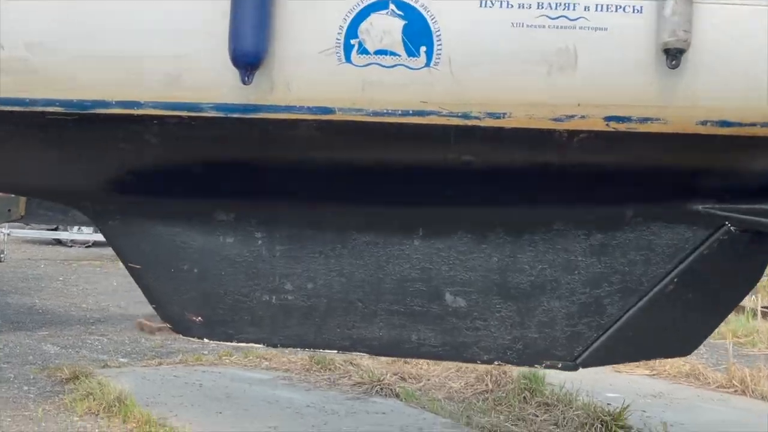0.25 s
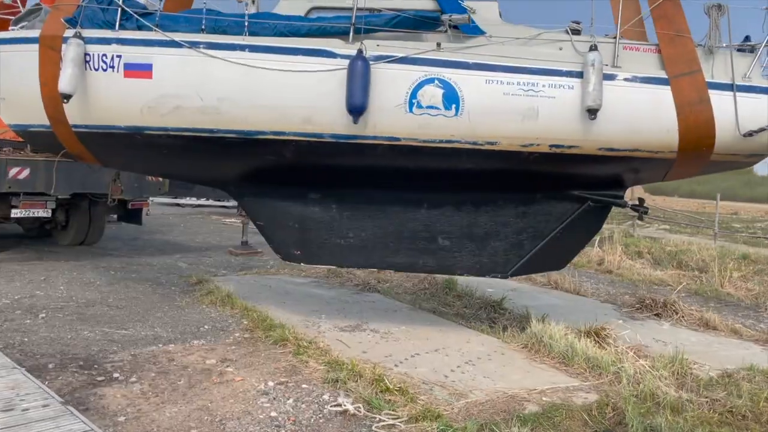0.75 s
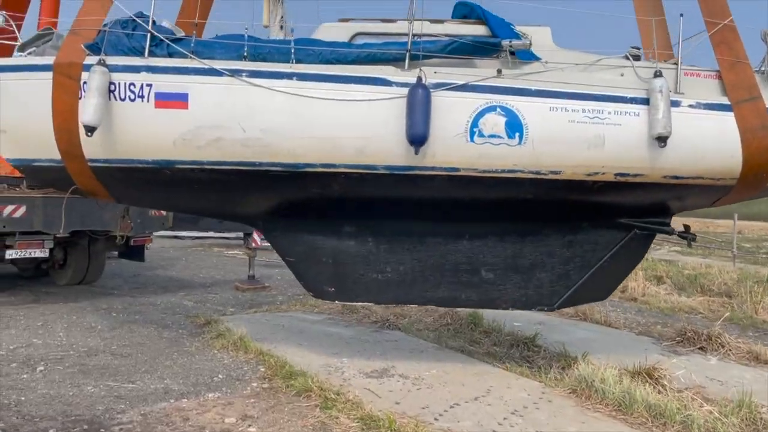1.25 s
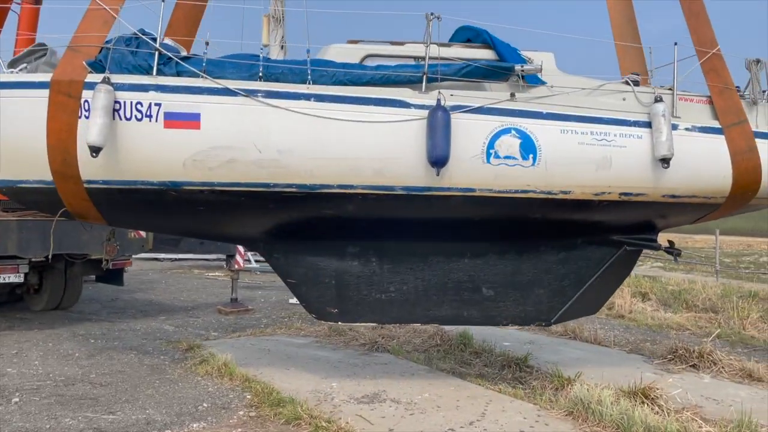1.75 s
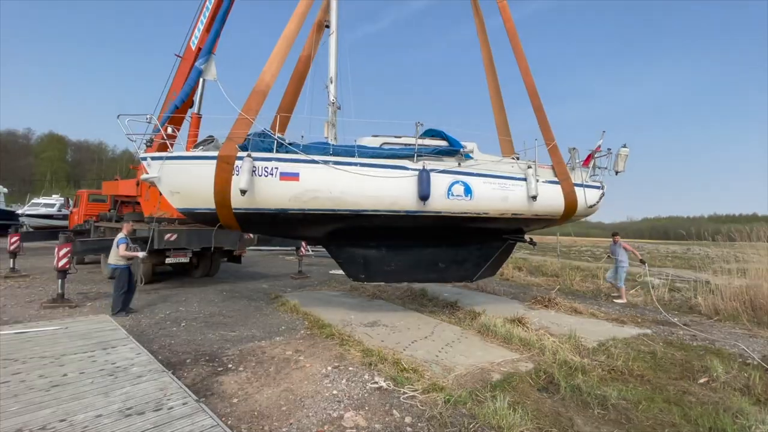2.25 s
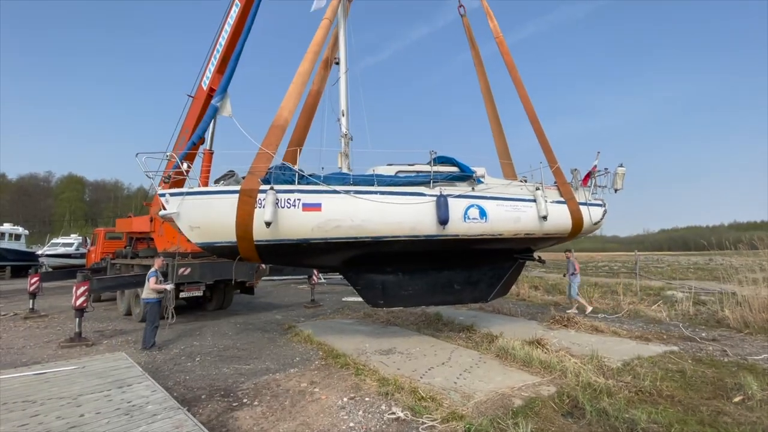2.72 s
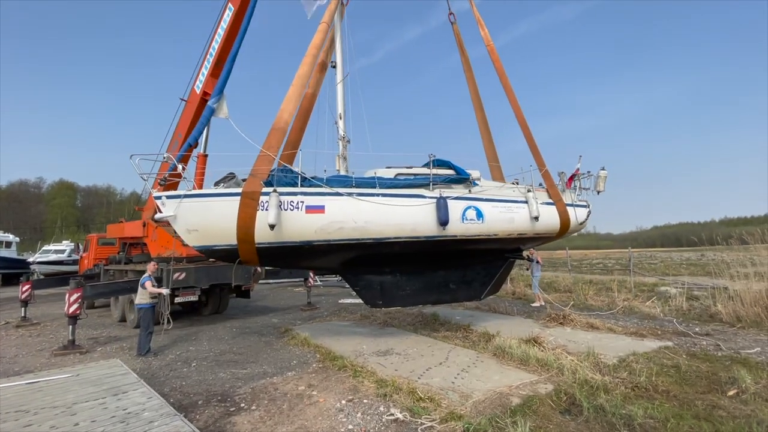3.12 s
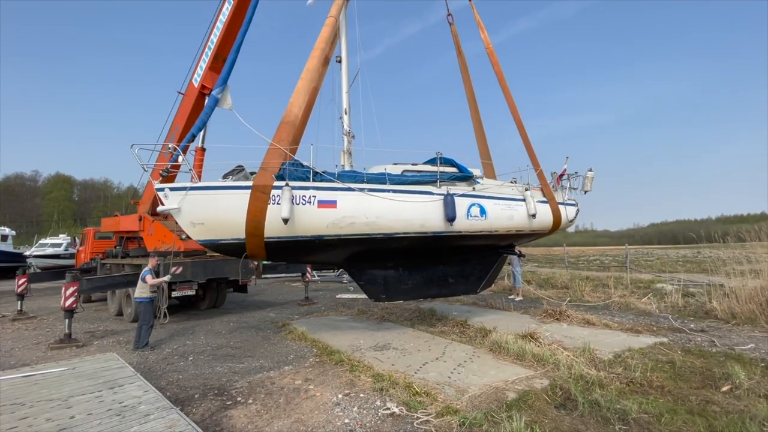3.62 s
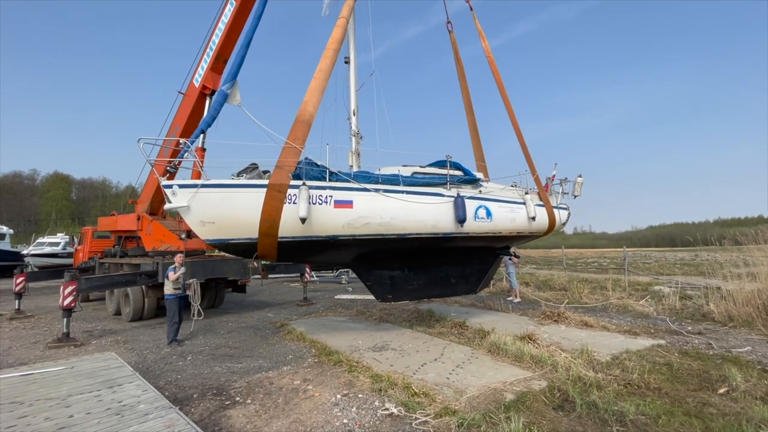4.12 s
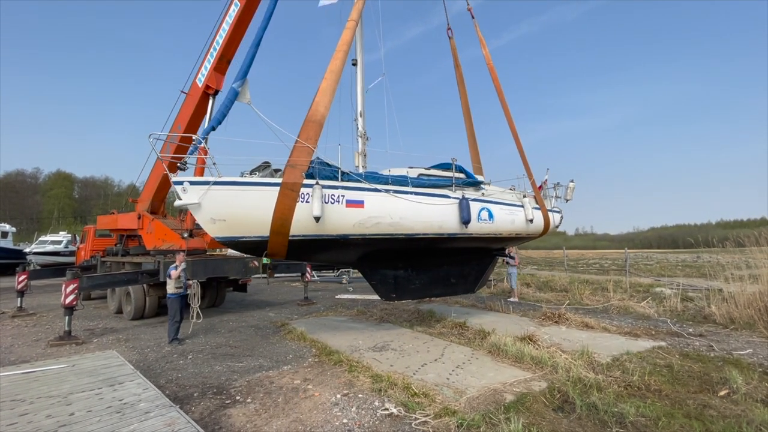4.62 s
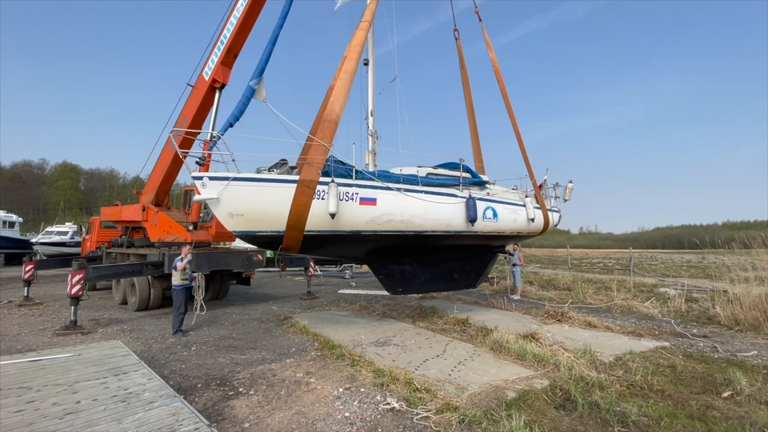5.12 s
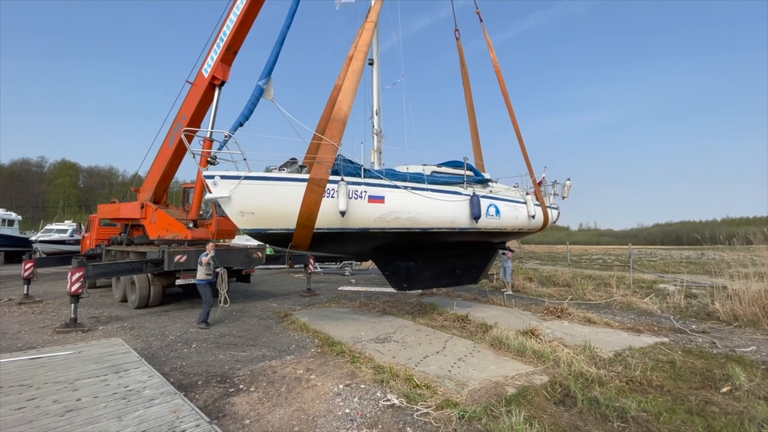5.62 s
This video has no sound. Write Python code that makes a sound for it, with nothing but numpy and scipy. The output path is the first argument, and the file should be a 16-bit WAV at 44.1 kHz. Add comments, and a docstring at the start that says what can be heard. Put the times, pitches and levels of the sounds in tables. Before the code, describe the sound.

A truck crane idles fast in an open yard, about ten metres to the left, and runs without a break for the whole six seconds or so. Its hydraulic pump makes a steady whine of stacked tones that wavers slightly. Beneath it the diesel engine drones and clatters, with ringing metal panels, a fine rattle and a faint ticking hiss. Light wind bumps the microphone at the start, and one brief scrape sounds at about 0.3 seconds. The sound widens just after half a second. The strongest gusts thump and snap on the microphone from about 1.4 to 1.8 seconds. The bass of both engine and wind then thins until roughly 3.2 seconds, while smaller gusts continue. More buffeting comes around 3.3 and 4.1 seconds, then the wind eases and the whine and clatter carry on to the end.

```python
"""You hear a steady whine over a droning, clattering diesel: a truck crane idling fast in an open yard,
some ten metres to the left. The pistons of its hydraulic pump make the whine, a stack of tones. The engine
hums through its exhaust and knocks against ringing panels, while air hisses in ticks. Wind buffets the two
microphone openings (ports): at first it presses both alike, later it pushes one as it pulls the other.
The bass of the whole sound, engine and wind alike, ducks for over a second, probably from the phone's
wind filter."""
import sys
import numpy as np
from scipy import signal
from scipy.fft import rfft, irfft, next_fast_len
from scipy.io import wavfile
from scipy.ndimage import uniform_filter1d, map_coordinates

SR = 44100
rng = np.random.default_rng(int(sys.argv[2]) if len(sys.argv) > 2 else 0)


def pcm_store(signal):
    """Save signal as 16-bit PCM."""
    levels = np.round(np.clip(np.atleast_2d(signal), -1, 1) * 32767)
    wavfile.write(sys.argv[1], SR, levels.astype(np.int16).T)


N = 258867
T, SIZE = np.arange(N) / SR, next_fast_len(N)
HZ = np.arange(SIZE // 2 + 1) * SR / SIZE

# The tone colours of six noises. Each row: frequency in Hz, relative strength there in dB.
YARD_SPECTRUM = [(25, -104), (50, -104), (90, -94), (150, -91), (250, -104), (500, -125)]
WIND_SPECTRUM = [(40, -50), (90, -27), (130, -11), (220, -1), (350, -5.5), (520, -3.5), (800, -7),
                 (1200, -15), (2000, -26), (3000, -63), (5000, -80)]
HISS_SPECTRUM = [(2500, -120), (4000, -95), (6300, -79), (7000, -87.5), (9000, -80), (10000, -82),
                 (12000, -85.5), (16000, -85)]
DRONE_SPECTRUM = [(40, -108), (90, -87), (130, -80), (170, -68), (230, -67), (300, -62), (450, -62.5),
                  (560, -67.5), (800, -64), (1100, -75.5), (1600, -77.5), (2500, -120)]
KNOCK_SPECTRUM = [(500, -120), (900, -69.5), (1150, -70.5), (1400, -71.5), (1650, -68.5), (1800, -76),
                  (2000, -67.5), (2230, -74.5), (2450, -68), (2750, -72), (3000, -71), (3200, -68),
                  (3300, -70), (3600, -66), (3900, -74), (4400, -78.5), (5200, -102), (7000, -120)]
TAPPET_SPECTRUM = [(2500, -110), (3800, -78.5), (4400, -76), (5000, -72.5), (5700, -79.5), (6300, -89),
                   (7500, -78.5), (10000, -120)]
# Steady wind. Each row: time in seconds, level alike on both ports in dB, opposed level in dB.
BREEZE = [(0, -34.5, -49), (.65, -36, -51), (.8, -32, -42), (1.15, -34.5, -44), (1.32, -38.5, -59),
          (1.42, -28.5, -35), (1.77, -33.5, -40), (1.88, -41, -54), (2.16, -38.5, -46), (2.2, -47, -38),
          (2.75, -42, -44), (3.2, -49, -43), (3.45, -70, -39), (3.75, -72, -40), (3.95, -65, -53),
          (4.4, -70, -54), (4.9, -70, -54), (5.87, -70, -46.5)]
# Gusts. Each row: time of the peak in seconds, alike level in dB, opposed level in dB, fade in seconds.
GUSTS = [(.15, -31, -45, 0.018), (.26, -30.5, -60, 0.017), (1.403, -23, -29, 0.03), (1.46, -32, -38, 0.03),
         (1.597, -23, -26, 0.026), (1.64, -25.5, -37, 0.02), (1.685, -25, -29, 0.012),
         (1.74, -25.5, -32, 0.033), (1.945, -35.5, -50, 0.16), (2.095, -32, -36, 0.014),
         (2.15, -31, -39, 0.009), (2.33, -43, -32, .04), (2.5, -44, -35, .04), (2.68, -49, -28, 0.022),
         (2.88, -39.5, -39, 0.08), (2.97, -48, -33, 0.017), (3.08, -56, -37, 0.043), (3.29, -45, -25, 0.03),
         (3.42, -60, -31, .06), (3.58, -60, -34, 0.032), (4.07, -60, -27, 0.028), (4.15, -64, -31, 0.044),
         (4.26, -58, -37, 0.073), (4.6, -58, -36, 0.08), (4.72, -60, -39, 0.14)]
# Wind thumps. Each row: start in seconds, level in dB, pitch in Hz, snap level against the thump in dB,
# snap pitch in Hz.
THUMPS = [(0.154, -22, 268, -12, 1250), (0.256, -21, 244, -14, 1250), (0.316, -27, 215, -6, 1250),
          (1.392, -16, 497, -12, 800), (1.4, -9.5, 484, -9, 1000), (1.409, -16, 254, -19, 1000),
          (1.419, -21, 291, -19, 1000), (1.441, -19, 350, -8, 1000), (1.459, -13.5, 303, -10, 1000),
          (1.479, -18, 480, -10, 1000), (1.511, -18, 500, -6, 1000), (1.522, -20, 192, -16, 1000),
          (1.59, -19, 480, -10, 1000), (1.597, -11.5, 252, -19, 1250), (1.627, -18, 330, -10, 900),
          (1.636, -17, 240, -10, 1000), (1.658, -18, 450, -10, 1000), (1.679, -10.5, 400, -2.5, 1370),
          (1.716, -14.5, 320, -3, 1000), (1.74, -16, 374, -7, 900), (1.75, -29, 282, -8, 900),
          (1.782, -23.5, 400, -1, 1100), (2.0965, -26, 353, 12, 850), (2.136, -23, 250, -14, 1000),
          (2.145, -24, 400, -12, 1000), (2.155, -23.5, 500, 10.5, 1560), (2.674, -29, 229, -14, 1250)]
# Sharp snaps of the opposed wind. Each row: start in seconds, level in dB.
SNAPS = [(2.084, -21), (2.154, -20), (2.181, -24), (2.232, -21), (2.652, -15), (2.685, -17), (3.267, -22),
         (3.29, -28)]
# Loudness over time. Each row: time in seconds, then bass, clatter and hiss gains in dB.
# The bass gain ducks engine and wind alike for over a second.
LEVELS = [(0, -1, -1, -3.5), (.55, -3.5, 0.5, -4), (1.2, -1, 0.5, -4.5), (1.8, -10.5, 1, -2.5),
          (1.9, -10, 2, -4), (2.2, -11, 1.5, -1), (2.75, -11, 2, 1), (2.92, -6, 2.5, 0.5),
          (3.1, -13, 2.3, 2), (3.17, -11, 2, -1), (3.28, -0.5, 2, 0), (3.8, -0.5, 2, 0.5),
          (4.5, -1.5, 1.83, 0.5), (5.87, -2, 2.5, 0)]
# The tappets' loudness. Each row: time in seconds, gain of the lower band in dB, of the upper band in dB.
TAPPET_LEVELS = [(0, -2, -1), (.7, 1.5, 1.5), (.9, 1, -2), (1.25, 1.5, 3.5), (1.8, -0.5, -2), (2, -0.5, 2),
                 (2.3, -1.5, -4), (2.75, 0.5, 3), (2.9, -1, 1), (3.2, 1.5, -0.5), (3.5, -3, 2.5),
                 (3.8, 0, -4.5), (4.2, 1, 0.5), (4.7, -2.5, 0.5), (5, 0, -1), (5.4, 2, -4.5),
                 (5.87, -0.5, 3)]
# Exhaust tones. Each row: multiple of the crankshaft's speed, base level in dB.
EXHAUST_TONES = [(4, -66.5), (8, -44.5), (11, -46.5), (12, -53.5), (13, -52.5), (14, -49.5), (15, -52.5),
                 (16, -44), (17, -51), (18, -45.5), (19, -54.5), (21, -55.5), (28, -55), (29, -54)]
# Ringing panels. Each entry: pitch in Hz.
PANEL_HZ = [2050, 2360, 2480, 2515, 2695, 2885, 3020, 3120, 3345, 3455, 3540, 3676, 5645]
# The same panels in order. Each row: width of the ring in Hz, base level in dB.
PANEL_RINGS = [(60, -68), (30, -54), (30, -46), (35, -48), (30, -56), (40, -45), (40, -53.5), (70, -61),
               (30, -49), (60, -44), (40, -50.5), (14, -49.5), (70, -54.5)]
# Main pump tones. Each row: time in seconds, then levels in dB at 2, 4, 5, 7 and 11 times the piston rate.
MAIN_PUMP_TONES = [ (0, -34.5, -38.5, -55, -49, -53), (.25, -39.5, -36, -52, -49, -47),
                   (.8, -40, -35.5, -50, -40.5, -42), (1.1, -41.5, -33, -44, -43, -45),
                   (1.7, -39, -32, -44, -60, -40.5), (1.93, -51, -31, -47, -56, -41),
                   (1.99, -39, -36, -46, -56, -41), (2.08, -50, -30, -43, -58, -47),
                   (2.2, -53, -35.5, -43, -59, -40), (2.33, -49, -37.5, -47, -60, -42),
                   (2.45, -49.5, -33.5, -42, -60, -40.5), (2.65, -44, -39, -42, -62, -35.5),
                   (2.8, -53, -36, -43, -62, -38), (2.92, -35.5, -36, -40, -62, -42),
                   (3.1, -58, -34.5, -42, -62, -45), (3.22, -39.5, -36.5, -41, -62, -41),
                   (3.7, -41, -37, -40, -65, -39.5), (4.3, -38.5, -36.5, -41, -58, -43),
                   (5, -39.5, -36.5, -44, -58, -47), (5.87, -39.5, -36.5, -49, -60, -50)]
# Other pump tones. Each row: multiple of the piston rate, base level in dB, shimmer in dB (tone() limits
# it), how strongly it follows the bass gain, how strongly it follows the clatter gain.
OTHER_PUMP_TONES = [(3, -45.5, 1.5, 0.25, 1.3), (6, -44, 5, 0, 0.86), (8, -45.5, 5, 0.019, 1.8),
                    (9, -57, 5, 0.54, 4.3), (10, -49, -0.3, 0.27, 3.5), (13, -52.5, 2.2, 0.31, 2.1)]
# The phone's body between the ports. Each row: frequency in Hz, left minus right in dB, likeness 0 to 1.
PORT_BALANCE = [(100, 0, 0.98), (1100, 2, 0.95), (1710, 0, 0.93), (2150, 14, 0.9), (2430, 11, 0.55),
                (3140, 3, 0.81), (3590, 2.5, 0.98), (4150, 0.5, 0.89), (5100, 7, 0.83), (5600, 3, 0.66),
                (8580, 0, 1), (10340, -3, 0.69), (11700, -1.5, 0.77), (13900, -.1, 0.96)]
# How far the left port is ahead. Each row: frequency in Hz, phase lead in radians.
LEFT_LEAD = [(100, 0), (1100, .3), (2050, 1.7), (2500, .6), (3100, .5), (3700, 1.1), (4500, 2.7),
             (5700, 2.1), (7000, 2.9), (9000, 3.2), (10100, 4.1), (11300, 4.4), (13000, 6.28)]


def undb(db):
    """Turns decibels into a plain multiplier."""
    return 10 ** (np.asarray(db) / 20)


def curves(table):
    """Turns each column of a time table into one value per sample."""
    s, *columns = np.transpose(table)
    return [np.interp(T, s, c) for c in columns]


def across(table, column):
    """Spreads one column of a frequency table over all the frequencies in HZ."""
    rows = np.array(table)
    return np.interp(np.log(HZ + 1), np.log(rows[:, 0]), rows[:, column])


def density(table):
    """The gains that give white noise the table's tone colour."""
    return undb(across(table, column=1)) * np.sqrt(SR / 2)


def colour(x, gain):
    """Filters a sound with one gain for each frequency."""
    return irfft(rfft(x, SIZE) * gain, SIZE)[..., :N]


def blend(pairs):
    """Filters each sound by its own gains and adds them up."""
    return sum(colour(x, gain) for x, gain in pairs)


def walk(rate):
    """A smooth random wobble with `rate` new values a second."""
    k = int(SR / rate)
    steps = np.repeat(rng.standard_normal(N // k + 1), k)
    return 2 * uniform_filter1d(uniform_filter1d(steps, k), k)[:N]


def flutter(rate):
    """A wobble without its slow swells."""
    quick = walk(rate)
    return quick - uniform_filter1d(quick, size=SR // 7)


def pulses(turns, depth, sharp):
    """A rounded puff at each whole turn, on top of a steady flow."""
    flow = 1 + depth * np.exp(sharp * (np.cos(2 * np.pi * turns) - 1))
    return flow / np.sqrt(np.mean(flow ** 2))


def noise():
    """Noise on three paths: direct, scattered to the left port, scattered to the right."""
    return rng.standard_normal((3, N))


def tone(turns, db, shimmer_db, blur):
    """A tone that wavers in level and phase on its way through gusty air."""
    shimmer = np.clip(shimmer_db, 0, 2.2) * (flutter(24) + walk(9) / 4)
    sway = blur * walk(30)
    return np.sqrt(2) * undb(db + shimmer) * np.sin(2 * np.pi * turns + sway + 7 * rng.random())


def add_blip(out, s, db, hz, rise_s):
    """Adds a few cycles that swell and quickly die away."""
    t, i = T[:2000], int(s * SR)
    swell = (t / rise_s * np.exp(1 - t / rise_s)) ** 2
    out[i:i + len(t)] += undb(db) * swell * np.sin(2 * np.pi * hz * t)


def yard():
    """The faint, distant rumble of the yard."""
    return colour(rng.standard_normal((2, N)), density(YARD_SPECTRUM))


def scrape(at_s=.325):
    """One brief scrape nearby, with a low chirp in it."""
    rub = rng.standard_normal(N) * np.exp(-((T - at_s) / .013) ** 2)
    rasp = 1 / (1 + ((HZ - 3400) / 1400) ** 4)
    chirp = 1.7 / (1 + ((HZ - 2050) / 90) ** 2)
    return colour(rub, undb(-22.5) * (rasp + chirp))


def wind_strength(rise_s=.025):
    """How hard the alike and the opposed wind blow: a breeze, plus gusts that swell and fade."""
    t = T[::44]
    s, alike_db, opposed_db, fade_s = np.transpose(GUSTS)[:, :, None]
    shape = np.exp(-np.where(t < s, ((t - s) / rise_s) ** 2, (t - s) / fade_s))
    gusts = [np.interp(T, t, np.linalg.norm(undb(db) * shape, axis=0)) for db in (alike_db, opposed_db)]
    return [np.hypot(undb(breeze_db), gust) for breeze_db, gust in zip(curves(BREEZE), gusts)]


def eddies(strength, flutter_db):
    """Swirls of air press on a port, each for a few hundredths of a second."""
    air = colour(rng.standard_normal(N) * undb(flutter_db * np.tanh(walk(75))), density(WIND_SPECTRUM))
    return air / np.sqrt(np.mean(air ** 2)) * strength


def wind_thumps():
    """The air in the port's hollow swings a few times under a brief snap."""
    out = np.zeros(N)
    for s, db, hz, snap_db, snap_hz in THUMPS:
        add_blip(out, s, db, hz, rise_s=1.08 / hz)
        add_blip(out, s, db + snap_db, snap_hz, rise_s=.0007)
    return out


def opposed_wind(strength, low_hz=144, high_hz=890):
    """Snapping wind pushes one port as it pulls the other, harder on the left."""
    band = 1 / np.sqrt((1 + (HZ / high_hz) ** 2) * (1 + (low_hz / (HZ + 1)) ** 4))
    push = colour(eddies(strength, flutter_db=4.3), band)
    for s, db in SNAPS:
        add_blip(push, s, db, hz=1300, rise_s=.0006)
    return push * np.array([[undb(4.5)], [-undb(.8)]])


def air_hiss(crank, hiss_db, ticks_per_turn=1.871):
    """A ticking hiss, perhaps the belt-driven compressor; its two bands flutter separately."""
    ticks = ticks_per_turn * crank
    ticks += .035 * np.cos(2 * np.pi * ticks)  # sharpens the start of each tick
    puffs = noise() * pulses(ticks, depth=.72, sharp=4.6) * undb(hiss_db)
    upper = np.clip((HZ - 9000) / 4000, 0, 1)
    return blend((puffs * undb(1.1 * flutter(70)), np.sqrt(band) * density(HISS_SPECTRUM))
                 for band in (upper, 1 - upper))


def tappets(crank, split_hz=5160):
    """The small parts that work the valves rattle eight times a turn and swell once a turn."""
    beat = pulses(8 * crank, depth=.21, sharp=1.3) * pulses(crank, depth=.54, sharp=3.6)
    taps = noise() * beat * undb(.75 * flutter(50))
    lower = 1 / (1 + (HZ / split_hz) ** 24)
    return blend((taps * undb(db), band * density(TAPPET_SPECTRUM))
                 for db, band in zip(curves(TAPPET_LEVELS), (lower, 1 - lower)))


def engine_knocks(crank, repeat_share=.3):
    """Eight knocks a turn set the panels ringing; part of the noise repeats on every turn."""
    knocks = noise()
    one_turn = rng.standard_normal(int(N / crank[-1]))
    repeated = map_coordinates(one_turn, [(crank + .0015 * walk(6)) * len(one_turn)], mode="grid-wrap")
    knocks[0] = np.sqrt(repeat_share) * repeated + np.sqrt(1 - repeat_share) * knocks[0]
    knocks *= pulses(8 * crank, depth=.21, sharp=1.7)
    ring_power = sum(undb(2 * db) * SR / (np.pi * width) * 2 / (1 + (2 * (HZ - hz) / width) ** 2) ** 2
                     for hz, (width, db) in zip(PANEL_HZ, PANEL_RINGS))
    return colour(knocks, np.sqrt(density(KNOCK_SPECTRUM) ** 2 + ring_power))


def engine_drone(crank):
    """The exhaust hums at multiples of the engine's speed, inside a low rushing noise."""
    drone = colour(noise() * undb(.8 * walk(14)), density(DRONE_SPECTRUM))
    drone[0] += sum(tone(k * crank, db, shimmer_db=2.3, blur=.34) for k, db in EXHAUST_TONES)
    return drone


def pump_whine(strokes, bass_db, clatter_db):
    """The pistons send out ripples of pressure, heard as a stack of tones; higher ones blur more."""
    main = sum(tone(k * strokes, db, shimmer_db=.9 + 1.6 / k, blur=.15 + .012 * k)
               for k, db in zip((2, 4, 5, 7, 11), curves(MAIN_PUMP_TONES)))
    others = sum(tone(k * strokes, db + bass * bass_db + clatter * clatter_db, shimmer_db, blur=.018 * k)
                 for k, db, shimmer_db, bass, clatter in OTHER_PUMP_TONES)
    return main + others


def piston_strokes(top_hz=325.25, sag_hz=2.3, sag_every_s=.3125, slowing_hz_per_s=.118):
    """Counts the pump's strokes so far; the speed sags regularly and slowly drifts down."""
    sag = np.abs(np.cos(np.pi * (T - .081) / sag_every_s)) ** 4
    return np.cumsum(top_hz - slowing_hz_per_s * T - sag_hz * sag) / SR


def ports(direct, left, right, widens_s=.53):
    """Direct sound reaches the left port first and scatter fills in. The stereo starts narrow."""
    like = np.clip(across(PORT_BALANCE, column=2), 0, 1)
    # each port takes half of the difference in level and phase
    half = undb(across(PORT_BALANCE, column=1) / 2) * np.exp(1j * across(LEFT_LEAD, column=1) / 2)
    even = np.sqrt(2 / (abs(half) ** 2 + abs(half) ** -2))  # keeps the total power the same
    wide = np.array([blend(((direct, even * tilt * like), (scatter, even * tilt * np.sqrt(1 - like ** 2))))
                     for tilt, scatter in ((half, left), (1 / half, right))])
    middle = colour(direct, np.sign(half.real) * undb(-1 - 2.2 * np.clip(HZ / 8000, 0, 1)))
    sides = colour(wide - wide[::-1], 1 / (1 + (HZ / 5600) ** 30))
    opened = np.clip((T - widens_s) / .06, 0, 1)
    return opened * wide + (1 - opened) * (middle + .28 * sides)


def duck_bass(sound, bass_db, below_hz=228):
    """The bass of engine and wind alike ducks for over a second, probably the phone's wind filter."""
    deep = colour(sound, 1 / (1 + (HZ / below_hz) ** 4))
    return sound + deep * (undb(bass_db) - 1)


def scene():
    """Mixes crane, wind and yard in stereo; one shared speed drives pump, engine and hiss."""
    bass_db, clatter_db, hiss_db = curves(LEVELS)
    strokes = piston_strokes()
    crank = strokes / 12.67  # turns of the engine's crankshaft so far
    paths = undb(bass_db) * engine_drone(crank)
    paths += undb(clatter_db) * (engine_knocks(crank) + tappets(crank))
    paths += air_hiss(crank, hiss_db)
    paths[0] += pump_whine(strokes, bass_db, clatter_db) + scrape()  # direct path only
    alike, opposed = wind_strength()
    wind = eddies(alike, flutter_db=3.1) + wind_thumps() + opposed_wind(opposed)
    return duck_bass(ports(*paths) + wind, bass_db) + yard()


def record(dry):
    """The phone cuts the bass below 75 Hz against wind, and the treble steeply above 15750 Hz."""
    thin = signal.sosfilt(signal.butter(2, 75, "high", fs=SR, output="sos"), dry)
    return signal.sosfilt(signal.ellip(12, .2, 75, 15750, fs=SR, output="sos"), thin)


dry = scene()
out = record(dry)
pcm_store(out)
```